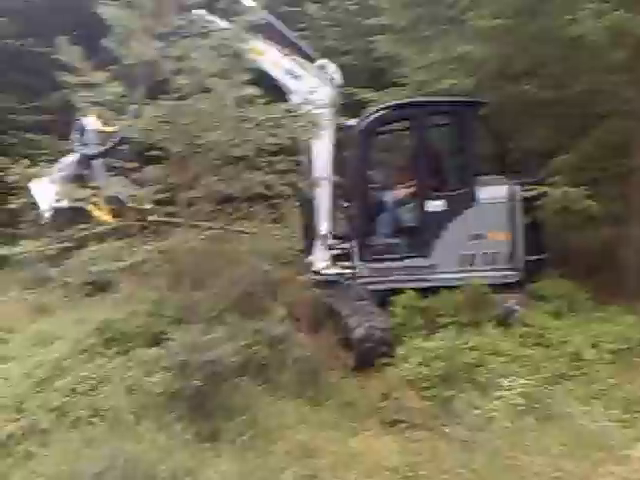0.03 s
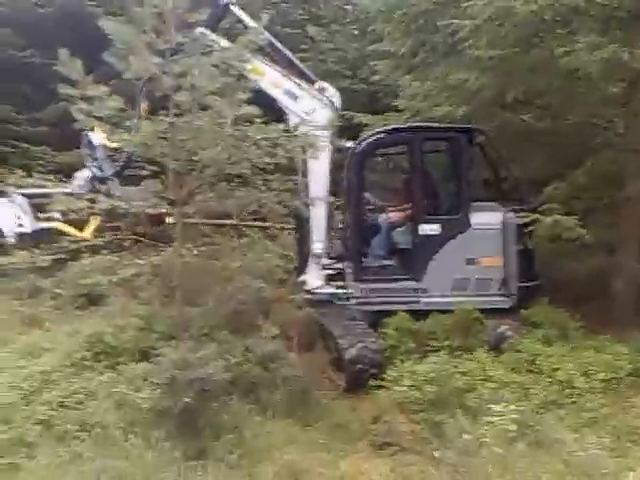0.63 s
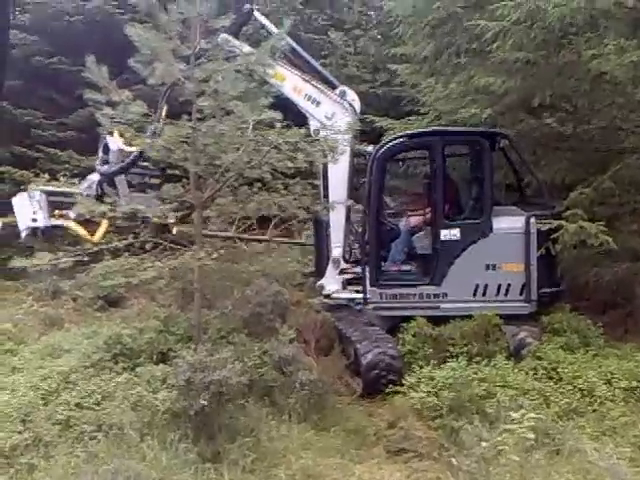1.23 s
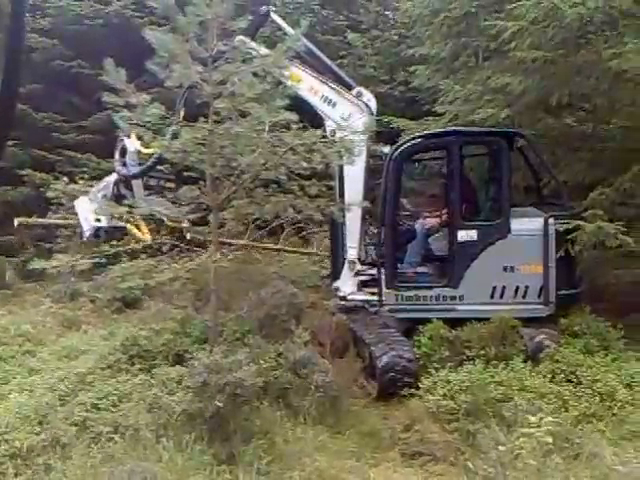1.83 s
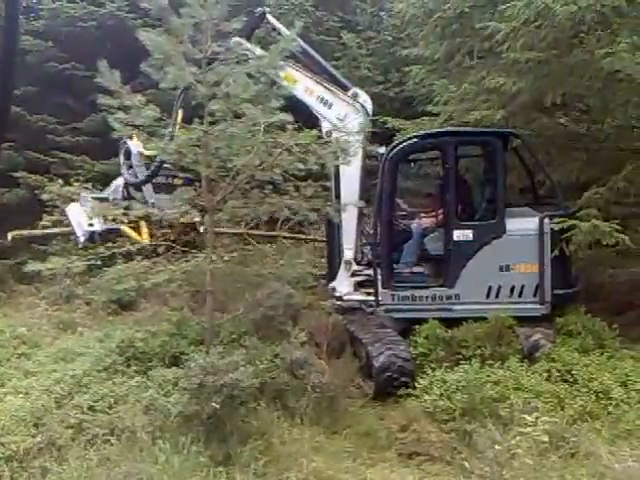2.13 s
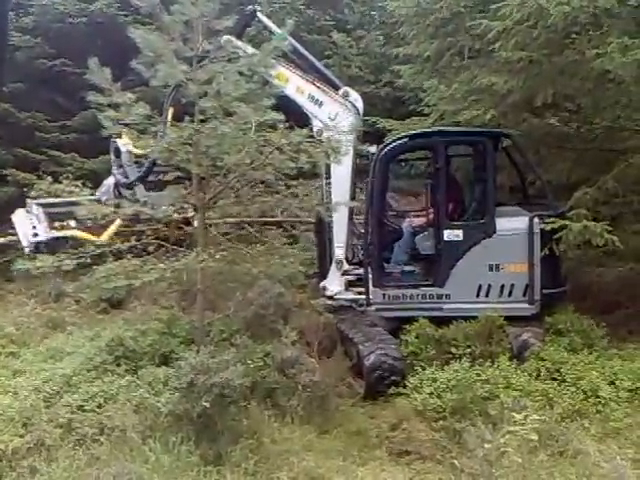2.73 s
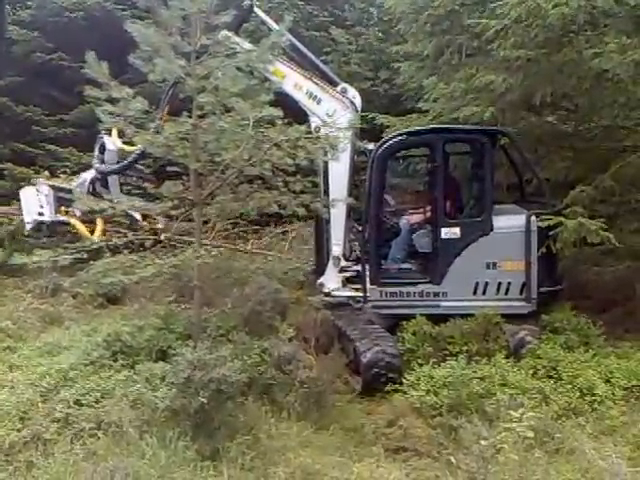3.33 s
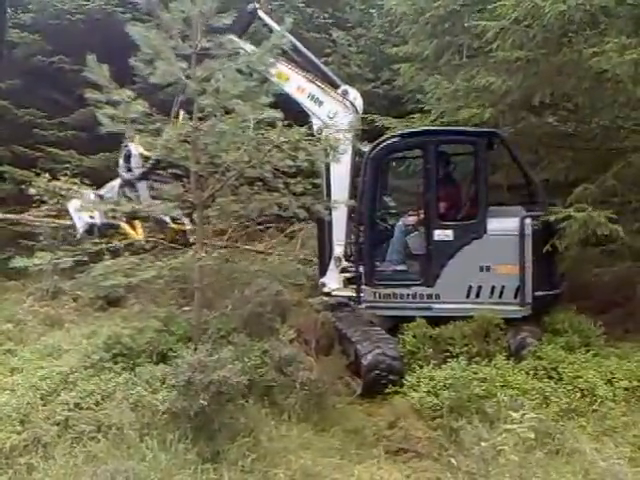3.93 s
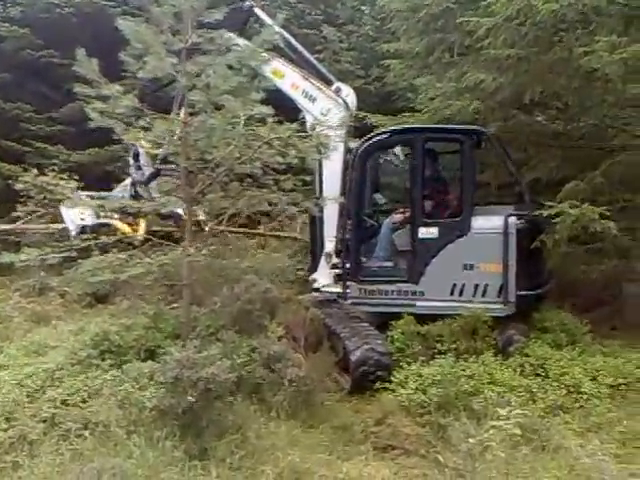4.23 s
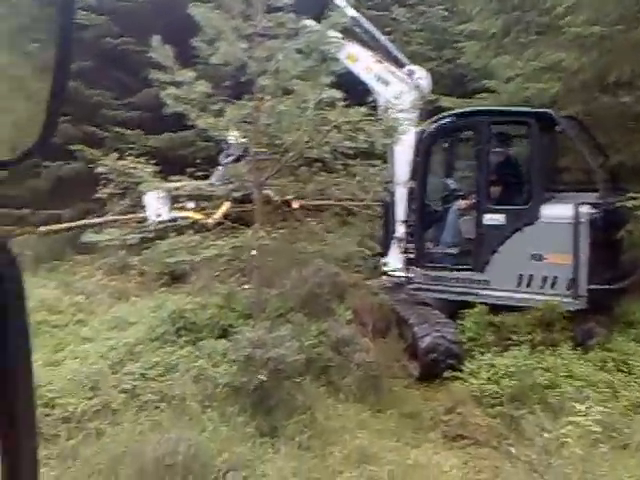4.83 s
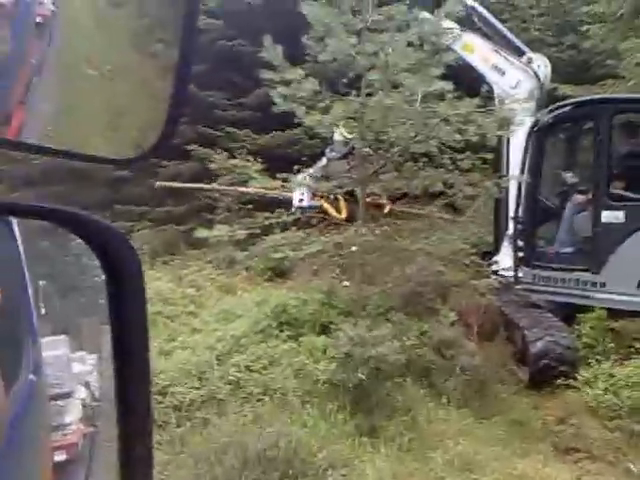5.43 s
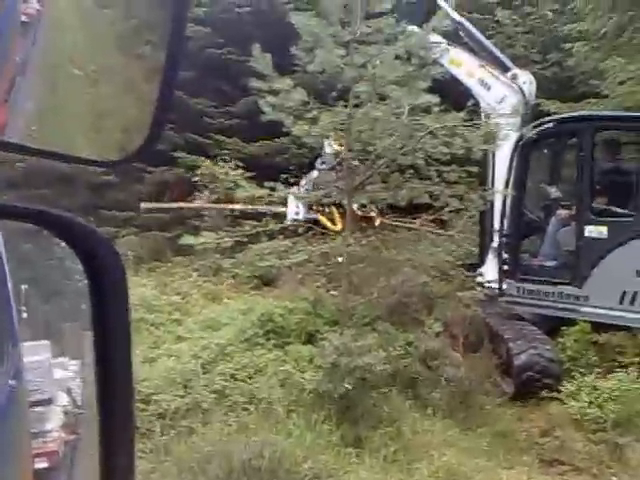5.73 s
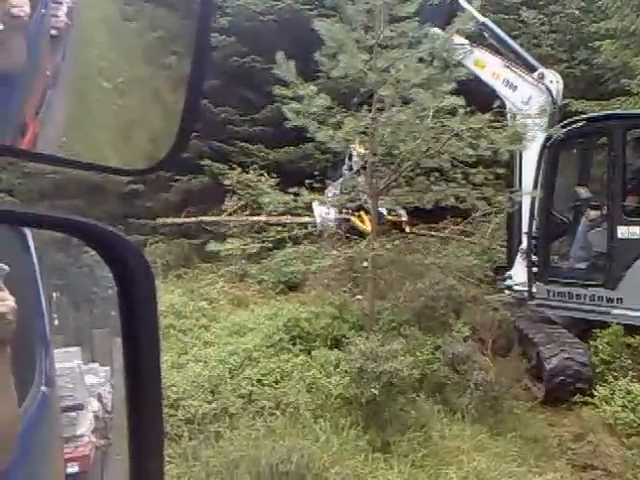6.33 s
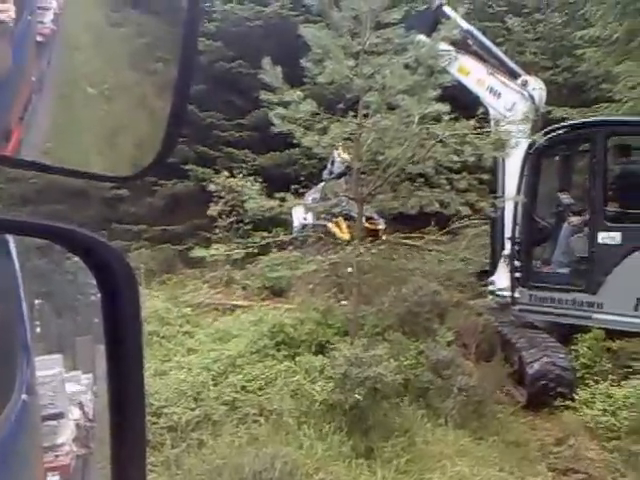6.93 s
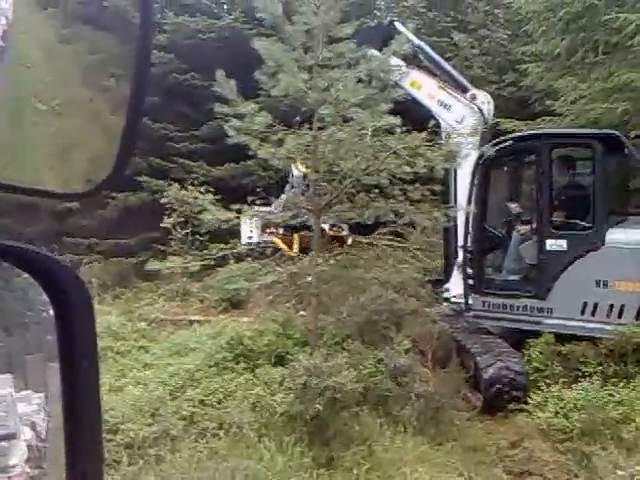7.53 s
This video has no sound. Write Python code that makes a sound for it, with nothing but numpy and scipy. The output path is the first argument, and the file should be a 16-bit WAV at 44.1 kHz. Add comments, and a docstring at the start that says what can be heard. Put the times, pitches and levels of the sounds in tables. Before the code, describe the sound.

A diesel tree harvester drones and whines while branches snap and a stem scrapes through its head, then a chain saw cuts briefly.

```python
"""Tree harvester in a conifer forest.

A tracked excavator drones: diesel knock, exhaust, hydraulic pump, fan. Feed rollers pull a stem through
the knives of its head: needles rustle, branches snap, the stem scrapes and thuds. A valve groans, then the
chain saw cuts the log off. The microphone pops as it switches on and opens a moment later."""
import sys
import numpy as np
from scipy import signal
from scipy.fft import rfft, irfft, next_fast_len
from scipy.io import wavfile
from scipy.ndimage import map_coordinates

SR = 44100
rng = np.random.default_rng(int(sys.argv[2]) if len(sys.argv) > 2 else 0)


def inscribe(sig):
    """Save sig as 16-bit PCM at rate SR to the path in sys.argv[1].

    A 1-D sig is mono; a 2-D sig holds one channel per row.
    Samples are clipped to [-1, 1] before scaling.
    """
    pcm = np.round(np.clip(np.atleast_2d(sig).T, -1, 1) * 32767)
    wavfile.write(sys.argv[1], SR, pcm.astype(np.int16))


N = 334278

# breaking branches: start_s, level_db, crack_hz, ring_hz, ring_re_crack_db, tear_s
SNAPS = [(0.3547, -6.5, 4870, 2300, -7, 0.0001), (0.3867, -11.5, 5400, 2900, -8, 0.000075),
         (0.4005, -9, 6250, 2500, -9, 0.000089), (0.4842, -16, 3900, 3400, -6, 0.0003),
         (0.499, -24, 5600, 2784, -15, 0.0019), (0.7089, -36, 5000, 3000, -12, 0.00078),
         (0.7577, -38, 5500, 3000, -27, .0003), (0.8247, -24, 4500, 3000, -12, 0.00017),
         (0.7729, -8.5, 3420, 3020, -5, 0.000093), (0.8276, -16, 3930, 3520, -9, 0.00033),
         (0.937, -25, 5200, 2920, -8, 0.000448), (0.977, -28.5, 4200, 2980, -16, .002),
         (1.0168, -12, 3860, 2310, -7, .0003), (1.067, -29, 6000, 3000, -15, 0.00046),
         (1.1035, -32, 5000, 2700, -12, .002), (1.381, -33, 5000, 2530, -1, 0.0014),
         (1.916, -41, 5500, 3000, -17, .001), (2.2294, -32.5, 4834, 3000, -8, .003),
         (2.259, -28, 4670, 3040, -16, 0.002), (2.363, -36, 5200, 3000, -18, .001),
         (2.379, -35.5, 5400, 2900, -15, .002), (2.4337, -20.5, 4400, 3300, -5, 0.00027),
         (2.4573, -25.5, 3670, 3300, -15, 0.00021), (2.608, -31.5, 5000, 3000, -16, 0.0025),
         (2.731, -21.5, 3232, 1795, 3.5, 0.00023), (2.758, -27, 5480, 3000, -20, 0.0014),
         (2.792, -26, 5890, 3040, -21, .0004), (4.044, -30, 2500, 2400, -10, 0.0037),
         (4.1842, -25.5, 4800, 3330, -16, 0.0013), (4.221, -37, 5500, 3000, -15, 0.00044),
         (4.239, -28.5, 5630, 3380, -8, 0.0017), (4.3488, -33.5, 3500, 3390, -14, 0.0021),
         (4.4178, -35, 5170, 3393, -18, 0.0014), (4.481, -37.5, 5200, 3400, -16, .002),
         (4.519, -29, 2960, 2000, -2, 0.0034), (4.537, -32, 5600, 2920, -20, 0.0013),
         (4.7882, -38.5, 5600, 2960, -19, .0006), (4.811, -27.5, 4230, 1950, -4, 0.0046),
         (5.345, -34.5, 6100, 3280, -20, 0.00018)]
# how hard the saw bites: time_s, level_db
SAW_BITE = [(5.99, -68), (6.03, -42.5), (6.08, -36), (6.2, -38), (6.33, -38), (6.4, -35.5), (6.5, -37),
            (6.63, -35.5), (6.75, -38), (6.95, -38), (7.04, -47), (7.25, -74)]


def diesel(no_load_hz=81.4, droop_hz=2):
    """Four-cylinder engine driving a pump; hydraulic load slows the firing rate."""
    # hydraulic work: time_s, load_fraction
    duty = [(0.9, 0.32), (1.25, 0.96), (2.1, 0.91), (2.5, 0), (2.9, 0), (3.2, 0.98), (3.7, .8), (4.5, 0.27),
            (5.6, 0.88), (7.4, 0.92)]
    load, = curves(duty)
    firings = np.cumsum((no_load_hz - droop_hz * load) * (1 + 0.003 * wobble(20))) / SR
    phase = 2 * np.pi * firings
    return exhaust(phase, load) + pump(phase) + engine_body(firings, load)


def engine_body(firings, load, pulse_depth=0.3, split_hz=500):
    """Knocks and pulsing noise ring the housing over the block's roar: drone below, clatter above."""
    # housing modes: centre_hz, width_hz, gain_db
    housing_modes = [(258.8, 26, -1), (335, 51, -3.5), (388, 15.1, 3.5), (588, 83, -5.5), (756, 94, -5),
                     (1109, 86, -2), (1756, 91, -7.5), (1959, 52, -3), (2332, 115, -5.5), (2544, 49, -3.5)]
    # block noise: freq_hz, density_db
    block_spectrum = [(18, -79), (30, -48), (70, -5), (124, -14), (145, -4.5), (221, -3.5), (259, 6),
                      (470, -17.5), (530, -5), (702, -9), (801, -4.5), (930, -11.5), (1070, -7.5),
                      (1300, -5), (1500, -16), (1800, -7), (2450, -9), (2740, -15), (2900, -16.5),
                      (3400, -21), (7270, -28.5), (16000, -61)]
    # low and high band: idle_db, load_boost_db, saw_boost_db, start_boost_db
    drone_levels = (-42, -1, 3, 18.5)
    clatter_levels = (-45, 2.5, 1, 15.5)
    knocks = cylinder_knocks(firings)
    pulsing = unit(rng.standard_normal(N) * (1 + pulse_depth * np.cos(2 * np.pi * firings)))
    band = lambda hz: 1 / (1 + (hz / 3000) ** 8) / (1 + (130 / (hz + 1)) ** 4)
    housing = filtered(pulsing + amp(-1) * knocks, lambda hz: resonator(housing_modes, hz) * band(hz))
    body = amp(-2) * unit(housing) + amp(-4) * coloured(rng.standard_normal(N), block_spectrum)
    low = filtered(body, lambda hz: 1 / (1 + (hz / split_hz) ** 6))
    drone = amp(effort_db(drone_levels, load) + 1.1 * wobble(11)) * low
    clatter = amp(effort_db(clatter_levels, load) + 0.31 * wobble(17)) * (body - low)
    return drone + clatter


def cylinder_knocks(firings, t60_s=0.041, jitter_s=0.00008):
    """Each cylinder has its own strength and delay, so lines fall between the firing harmonics."""
    delay_s = np.array([0.0014, 0.000825, 0.00242, 0.001885])
    strength = np.array([0.7, 0.57, 0.85, 0.34])
    fired = np.flatnonzero(np.diff(np.floor(firings)))
    cylinder = np.arange(len(fired)) % 4
    late_s = delay_s[cylinder] + jitter_s * rng.standard_normal(N)[fired]
    knocks = np.zeros(N)
    knocks[np.clip(fired + np.round(late_s * SR).astype(int), 0, N - 1)] = strength[cylinder]
    t = np.arange(SR // 40) / SR
    panels = rng.standard_normal(len(t)) * decay(t, t60_s)
    return unit(signal.fftconvolve(knocks, panels)[:N])


def exhaust(phase, load):
    """Firing tone and its octave, which swells as the microphone turns."""
    # idle_db, load_boost_db, saw_boost_db, start_boost_db
    levels = (-60.5, 6.5, 2, 1.5)
    # second harmonic: time_s, level_re_first_db
    octave_swell = [(4.6, -0.5), (5.2, 3.5)]
    octave_db, = curves(octave_swell)
    gain = amp(effort_db(levels, load) + 0.61 * wobble(10))
    return gain * (np.sin(phase) + amp(octave_db + wobble(16)) * np.sin(2 * phase))


def pump(phase, pistons=9, fifth_db=-14):
    """Piston whine with a faint fifth above, swelling with oil pressure."""
    # whine: time_s, level_db
    swell = [(1.2, -44), (1.8, -48.5), (2.2, -45.5), (2.6, -69), (2.95, -56), (3.2, -45.5), (3.8, -53.5),
             (4.15, -50), (4.5, -57), (5.0, -48.5), (5.35, -50), (5.5, -46), (5.65, -51), (5.95, -44.5),
             (6.2, -41.5), (6.3, -45), (6.45, -39.5), (6.65, -49.5), (6.8, -40), (7.1, -49), (7.55, -49)]
    level_db, = curves(swell)
    whine = np.sin(pistons * phase + .28 * wobble(55) + .15 * wobble(160))
    fifth = amp(fifth_db) * np.sin(1.5 * pistons * phase + .6 * wobble(40))
    return amp(level_db + 1.8 * wobble(11) + 2 * wobble(70)) * (whine + fifth)


def saw(tone_db=-6, chips_db=-2, rasp_db=-3.5, squeal_db=-1, chatter_db=2, harmonics=10):
    """Cutters strike the wood at a pitch that sags mid-log; chips hiss and rasp in the bar."""
    # chain speed: time_s, cutter_hz
    chain = [(6.03, 660), (6.075, 690), (6.11, 675), (6.15, 668), (6.2, 638), (6.26, 647), (6.33, 641),
             (6.37, 624), (6.4, 612), (6.44, 606), (6.5, 610), (6.63, 629), (6.71, 670), (6.92, 668),
             (7.1, 630)]
    # bar modes: centre_hz, width_hz, gain_db
    bar_modes = [(670, 39, -0.5), (1231, 17, -0.5), (1983, 31, 1), (2219, 131.5, 5), (2676, 65, 1),
                 (3070, 150, -0.5), (3540, 320, -2.5), (4400, 140, -8), (4930, 100, -1), (5300, 570, -7),
                 (6330, 160, -4), (8140, 172, -7)]
    # chain grabs in the kerf, one harmonic rings: centre_s, half_length_s, harmonic, level_db
    squeals = [(6.125, .035, 4, -1), (6.125, .028, 8, -4), (6.265, .028, 8, -4), (6.39, .045, 6, 0),
               (6.47, .045, 8, -1.5), (6.48, .06, 5, -3), (6.56, .07, 2, -4), (6.57, .06, 6, -3.5),
               (6.62, .035, 5, -1), (6.665, .03, 4, -1), (6.72, .03, 3, 0), (6.82, .04, 3, -1),
               (6.82, .12, 1, -8), (6.87, .1, 2, -10), (6.9, .07, 4, -4)]
    # flying chips: freq_hz, density_db
    chip_spectrum = [(300, -11), (650, -1), (1450, 0), (2200, 5.5), (2850, 1.5), (3500, 0.5), (4000, 1),
                     (4400, 3), (5200, -0.5), (7000, -4), (8300, -4.5), (9700, -20), (12500, -9.5),
                     (16000, -28)]
    t = np.arange(N) / SR
    cutter_hz, = curves(chain)
    bite_db, = curves(SAW_BITE)
    phase = 2 * np.pi * np.cumsum(cutter_hz * (1 + .004 * wobble(260))) / SR
    bar = lambda hz: np.sqrt(sum(amp(db) ** 2 / (1 + (2 * (hz - centre) / width) ** 2)
                                 for centre, width, db in bar_modes))
    whine = np.zeros(N)
    for k in range(1, harmonics + 1):
        grip = amp(tone_db + 2.6 * wobble(25))
        squeal = sum(amp(db + squeal_db) * np.exp(-((t - centre_s) / half_s) ** 2)
                     for centre_s, half_s, harmonic, db in squeals if harmonic == k)
        chatter = amp(chatter_db * wobble(70))
        tone = np.sin(k * (phase + .03 * wobble(200)) + .42 * wobble(55))
        whine += np.hypot(grip * bar(k * cutter_hz), squeal) * chatter * tone
    # one puff of chips per cutter
    puffs = lambda: rng.standard_normal(N) * amp(0.57 * wobble(150)) * (1 + 0.25 * np.cos(phase))
    chips = amp(chips_db) * coloured(puffs(), chip_spectrum)
    rasp = amp(rasp_db) * unit(filtered(puffs(), bar))
    return amp(bite_db) * (whine + chips + rasp)


def snaps(gain_db=-21, crack_t60_s=0.011, splinter_t60_s=0.068, brittle_s=0.00071, ring_rise_s=0.00041):
    """A branch cracks and splinters, and the broken piece rings; green twigs tear slowly."""
    # breaking wood: freq_hz, density_db
    wood_spectrum = [(300, 8), (1500, 9.5), (3000, 6), (6000, 8.5), (8300, -1.5), (9700, -11),
                     (12500, -1.5), (16000, -16)]
    # bending modes: pitch_ratio, level_db, t60_s
    branch_modes = [(1, 0, .016), (1.88, -6, .011), (2.45, -5, .009)]
    out, t = np.zeros(N), np.arange(4096) / SR
    hz = np.fft.rfftfreq(len(t), 1 / SR)
    for start_s, level_db, crack_hz, ring_hz, ring_db, tear_s in SNAPS:
        fade = decay(t, crack_t60_s + 2 * tear_s) + amp(-12) * decay(t, splinter_t60_s)
        fibres = unit(rng.standard_normal(len(t)) * rise(t, tear_s) * fade)
        # dry wood parts all at once
        fibres[round(2 * tear_s * SR)] += np.sqrt(len(t)) * amp(1) * np.exp(-tear_s / brittle_s)
        octaves = np.log2((hz + 1) / crack_hz)
        rolloff_db = np.maximum(octaves, -7 * octaves)  # 1 dB/octave above, 7 below
        resonance = 1 + 0.68 / (1 + (2 * (hz - crack_hz) / 1300) ** 2)  # 1300 Hz wide
        wood = causal(resonance * amp(along(wood_spectrum, hz) - rolloff_db))
        crack = unit(signal.fftconvolve(fibres, wood)[:len(t)])
        ring = unit(ringing(branch_modes, t, ring_hz) * rise(t, ring_rise_s))
        add(out, start_s, amp(level_db + gain_db) * (crack + amp(ring_db) * ring))
    return out


def stem_rattles(bark_db=-2, steel_db=-4, contacts_per_s=6000, bass_hz=800, bass_t60_s=0.96):
    """Knots pass the knives in bursts of dense contacts, each at another spot on the frame."""
    # scrapes (slow rise), knocks (fast): start_s, level_db, rise_s, t60_s, bass_db, knife_hz, knife_db
    bursts = [(0.2435, -13, 0.0013, 0.021, 7.5, 4900, -32), (0.319, -22, 0.039, 0.85, 0.5, 5270, -12),
              (0.799, -28, 0.012, 0.65, 1, 4700, -18), (1.086, -27, 0.0047, 0.27, -3, 4830, -11.5),
              (1.372, -32, 0.002, 0.34, -8, 4650, -15), (1.951, -25.5, 0.0011, 0.43, -1.5, 4800, -15),
              (2.259, -27.5, 0.012, 0.27, -5, 5700, -12), (2.449, -31.5, .012, 0.28, -8, 5400, -24),
              (2.75, -35, 0.0078, 0.47, -0.5, 4500, -14), (3.0, -30, 0.017, 0.23, -6, 5300, -16),
              (3.274, -28, 0.011, 0.21, -3, 4400, -13), (3.919, -28.5, 0.0017, 0.26, 0.5, 4600, -13.5),
              (4.039, -30.5, 0.0039, .21, -1, 4640, -14), (4.123, -31, 0.0018, 0.9, 1.5, 4950, -14),
              (4.862, -32, 0.0056, 0.52, -11, 5400, -13.5), (4.945, -36.5, .003, 0.24, 0, 4500, -20),
              (5.172, -33.5, 0.002, 0.23, -10, 5274, -13.5), (5.79, -31, 0.00073, 0.31, -4.5, 4490, -26),
              (5.921, -34.5, 0.017, 0.41, -4, 4500, -16)]
    # scraping bark: freq_hz, density_db
    bark_spectrum = [(71, -42), (120, -12), (350, 6.5), (504, -3.5), (754, -9), (1230, -5), (1360, -10.5),
                     (2340, -6), (2750, -13), (3950, -25.5), (5460, -20.5), (8350, -26), (9430, -52),
                     (12300, -33), (15000, -58)]
    # steel frame modes: centre_hz, width_hz, gain_db
    frame_modes = [(354, 75, -3), (785, 71, 5.5), (1813, 110, -2.5), (2400, 160, -2.5), (3490, 89, -9),
                   (4400, 300, -20.5), (5600, 350, -22)]
    out, t = np.zeros(N), np.arange(SR // 2) / SR
    hz = np.fft.rfftfreq(len(t), 1 / SR)
    through = lambda x, gain: irfft(rfft(x) * gain, len(t))
    contacts = lambda gain: unit(through(grains(contacts_per_s, len(t)), gain))
    for start_s, level_db, rise_s, t60_s, bass_db, knife_hz, knife_db in bursts:
        spot_modes = [(centre, width, db + 2 * rng.standard_normal()) for centre, width, db in frame_modes]
        knife = resonator([(knife_hz, 2200, 0)], hz) ** 2  # broad: damped by the wood
        scrape = amp(bark_db) * contacts(amp(along(bark_spectrum, hz)))
        scrape += amp(steel_db) * contacts(resonator(spot_modes, hz))
        scrape += amp(knife_db) * contacts(knife)
        # low modes shake only while the push is hard
        bass = through(scrape, 1 / (1 + (hz / bass_hz) ** 4))
        scrape += bass * (amp(bass_db) * decay(t, bass_t60_s) - 1)
        add(out, start_s, amp(level_db) * rise(t, rise_s) * decay(t, t60_s) * scrape)
    return out


def stem_thuds(rise_s=0.011):
    """Hard blows against the head ring the stem's low modes."""
    # blows: start_s, level_db
    blows = [(0.773, -23), (1.957, -24), (2.276, -23), (4.122, -10.5)]
    # stem modes: pitch_hz, level_db, t60_s
    stem_modes = [(254.7, 2, 0.072), (341, -21, 0.33)]
    out, t = np.zeros(N), np.arange(SR // 2) / SR
    thud = ringing(stem_modes, t) * rise(t, rise_s)
    for start_s, level_db in blows:
        add(out, start_s, amp(level_db) * thud)
    return out


def needles(ramp_s=0.15, start_boost_db=28, bend_s=0.0082, shake_s=0.033, twigs_per_s=70):
    """Foliage hisses and crackles through the knives; it stirs before each snap and shakes after."""
    # feed roller strokes: start_s, end_s, level_db
    strokes = [(0.205, 0.85, -66.5), (0.915, 2.14, -57), (2.233, 2.82, -58.5), (3.02, 3.8, -58),
               (3.97, 4.404, -53), (4.5, 5.25, -57.5)]
    # foliage: freq_hz, density_db
    spectrum = [(1000, -2.5), (3300, -3), (4000, -8.5), (5200, -2.5), (8000, -8.5), (9700, -22.5),
                (12300, -12), (16000, -28)]
    t = np.arange(N) / SR
    feed = sum(amp(db) * np.clip(np.minimum(t - start_s, end_s - t) / ramp_s + .5, 0, 1)
               for start_s, end_s, db in strokes)
    feed *= amp(start_boost_db * settling())
    shake = sum(amp(db - 25) * np.exp(-np.maximum((snap_s - t) / bend_s, (t - snap_s) / shake_s))
                for snap_s, db, *_ in SNAPS)
    tears = signal.fftconvolve(np.abs(grains(twigs_per_s, N)), decay(t[:SR // 20], t60_s=0.016))[:N]
    hiss = rng.standard_normal(N)
    crackle = amp(-4) * unit(tears * rng.standard_normal(N))
    return np.hypot(feed, shake) * amp(1.16 * wobble(29.8)) * coloured(hiss + crackle, spectrum)


def valve(start_s=5.79, length_s=0.11, from_hz=515, to_hz=610, level_db=-42.5):
    """Oil groans through a valve as the saw swings out."""
    travel = np.clip((np.arange(N) / SR - start_s) / length_s, 0, 1)
    phase = 2 * np.pi * np.cumsum(from_hz + (to_hz - from_hz) * travel) / SR
    return amp(level_db) * np.sin(np.pi * travel) * np.sin(phase + .4 * wobble(81))


def fan(level_db=-56):
    """Steady hiss of cooling air."""
    # air noise: freq_hz, density_db
    spectrum = [(1500, -0.5), (3000, 5), (4000, -5), (5300, 2.5), (6400, -3), (7500, 1), (8700, -10.5),
                (9700, -17), (12300, -11), (16000, -26)]
    return amp(level_db) * coloured(rng.standard_normal(N), spectrum)


def forest_echo(x, level_db=-13.5):
    """Trunks scatter a short diffuse echo, shortest in the lower treble."""
    # echo decay: freq_hz, t60_s
    decay_times = [(200, 0.96), (2000, 0.21), (6000, 0.18), (14000, 0.83)]
    hz, t, noise = signal.stft(rng.standard_normal(SR // 2), SR, nperseg=256)
    tail = signal.istft(noise * decay(t, along(decay_times, hz)[:, None]), SR, nperseg=256)[1]
    return amp(level_db) * signal.fftconvolve(x, tail / np.linalg.norm(tail))[:N]


def effort_db(levels, load):
    """Level of an engine part as load and sawing change."""
    idle_db, load_db, saw_db, start_db = levels
    bite_db, = curves(SAW_BITE)
    sawing = amp(bite_db - bite_db.max())
    return idle_db + load_db * load + saw_db * sawing + start_db * settling()


def settling(tau_s=1.144):
    """The loud start dying away, 1 to 0."""
    return np.exp(-np.arange(N) / SR / tau_s)


def amp(db):
    """Decibels to gain."""
    return 10 ** (np.asarray(db) / 20)


def unit(x):
    """Scale to rms 1."""
    return x / np.sqrt(np.mean(x ** 2) + 1e-20)


def rise(t, tau_s):
    """Attack, 0 to 1."""
    return 1 - np.exp(-t / tau_s)


def decay(t, t60_s):
    """Fall of 60 dB per t60_s."""
    return amp(-60 * t / t60_s)


def ringing(modes, t, pitch_scale=1):
    """Sum of decaying sines."""
    return sum(amp(db) * decay(t, t60_s) * np.sin(2 * np.pi * pitch * pitch_scale * t)
               for pitch, db, t60_s in modes)


def resonator(modes, hz):
    """Complex response of band-pass modes, alternating in sign."""
    return sum((-1) ** k * amp(db) * 1j * hz * width / (centre ** 2 - hz ** 2 + 1j * hz * width)
               for k, (centre, width, db) in enumerate(modes))


def along(points, hz):
    """Interpolate on a log frequency axis."""
    knots_hz, values = np.transpose(points)
    return np.interp(np.log(hz + 1), np.log(knots_hz + 1), values)


def curves(rows):
    """One value per sample for each column after the time."""
    time_s, *columns = np.transpose(rows)
    return [np.interp(np.arange(N) / SR, time_s, column) for column in columns]


def wobble(knots_per_s):
    """Smooth random curve."""
    knots = rng.standard_normal(int(N * knots_per_s / SR) + 4)
    return map_coordinates(knots, [np.arange(N) * knots_per_s / SR])


def grains(ticks_per_s, samples):
    """Random ticks of uneven size, rms 1."""
    return unit(rng.standard_normal(samples) * (rng.random(samples) < ticks_per_s / SR))


def filtered(x, response):
    """Apply a complex frequency response."""
    size = next_fast_len(N + SR // 2)
    return irfft(rfft(x, size) * response(np.fft.rfftfreq(size, 1 / SR)), size)[:N]


def coloured(x, spectrum):
    """Shape by a spectrum, rms 1."""
    return unit(filtered(x, lambda hz: amp(along(spectrum, hz))))


def causal(gain):
    """Minimum-phase impulse response with this gain."""
    cepstrum = irfft(np.log(np.maximum(gain, 1e-6)))
    half = len(cepstrum) // 2
    cepstrum[1:half] *= 2
    cepstrum[half + 1:] = 0
    return irfft(np.exp(rfft(cepstrum)))


def add(track, start_s, sound):
    """Mix a sound into the track."""
    part = track[max(round(start_s * SR), 0):][:len(sound)]
    part += sound[:len(part)]


def switch_on_pop(centre_s=0.0716, push_hz=780, overshoot_hz=1400, width_s=0.00075, limit=0.62):
    """Electrical pop: one overloaded swing with a burst of crackle."""
    out, t = np.zeros(N), np.arange(-SR // 200, SR // 200) / SR
    swing = 0.43 * (np.cos(2 * np.pi * push_hz * t) + np.cos(2 * np.pi * overshoot_hz * t))
    crackle = 0.86 * rng.standard_normal(len(t))
    pop = np.exp(-np.abs(t) / width_s) * (swing + crackle)
    add(out, centre_s + t[0], np.clip(pop, -limit, limit))
    return out


def scene():
    """The machine at work; only the snaps echo."""
    cracks = snaps()
    machine = diesel() + fan() + needles() + stem_rattles() + stem_thuds() + valve() + saw()
    return (machine + cracks + forest_echo(cracks))[None]


def record(dry, open_s=0.234, fade_s=0.0084, top_hz=16000):
    """The band-limited microphone pops, stays mute a moment, then opens."""
    opened = np.clip((np.arange(N) / SR - open_s) / fade_s, 0, 1)
    band_limit = lambda hz: np.clip((top_hz - hz) / 500 + .5, 0, 1)
    return filtered(dry[0] * opened + switch_on_pop(), band_limit)[None]


dry = scene()
out = record(dry)
inscribe(out)
```